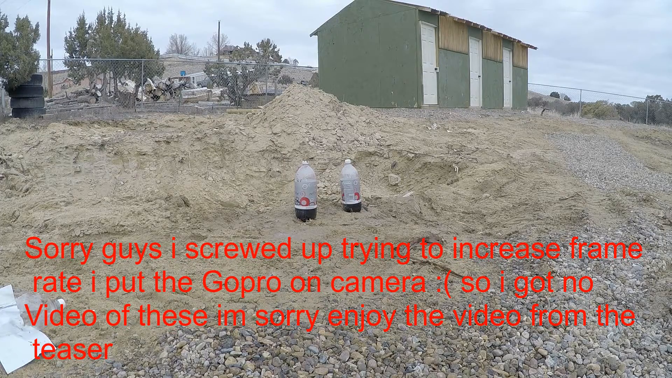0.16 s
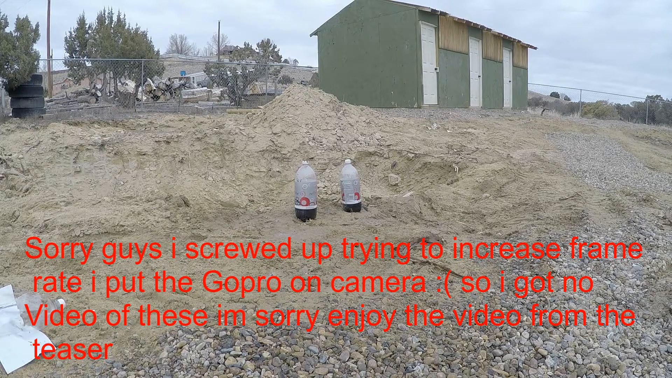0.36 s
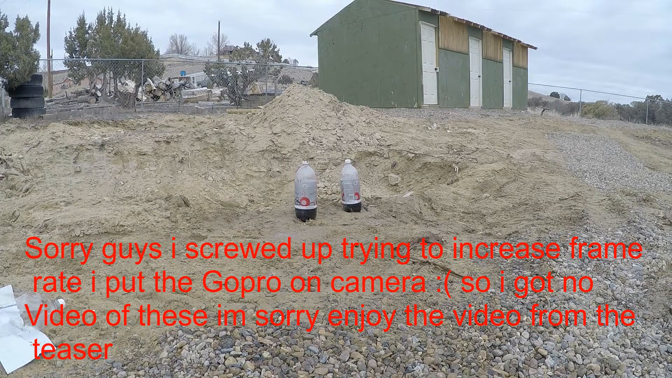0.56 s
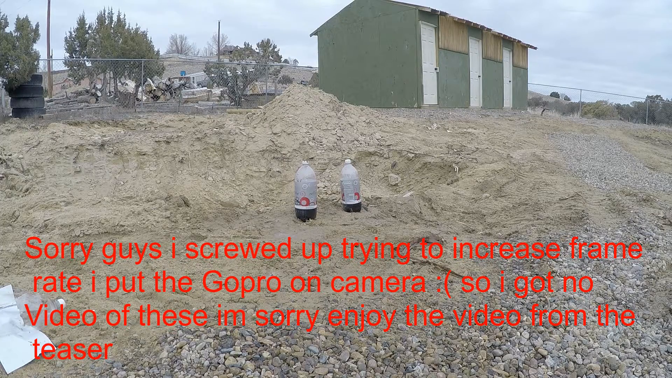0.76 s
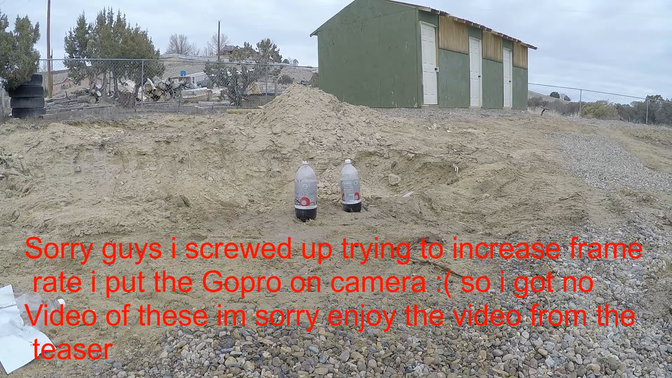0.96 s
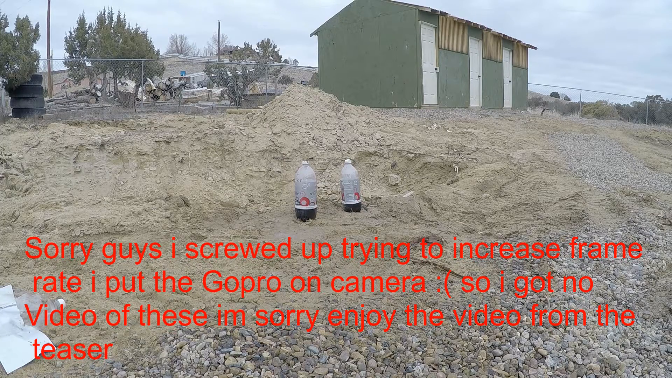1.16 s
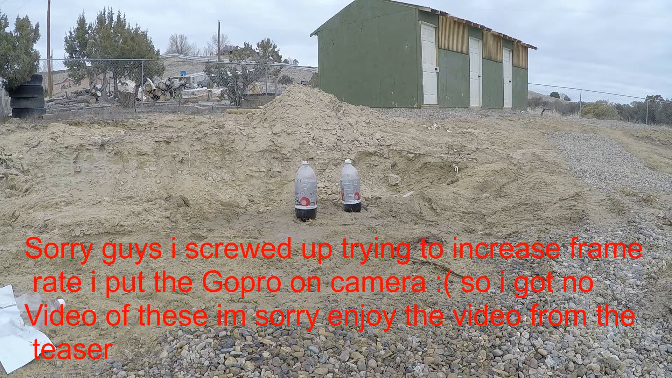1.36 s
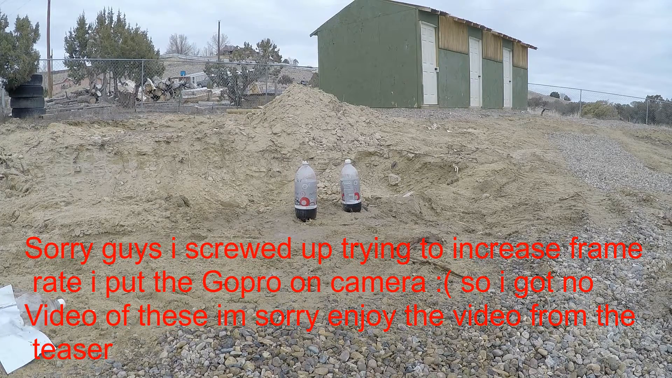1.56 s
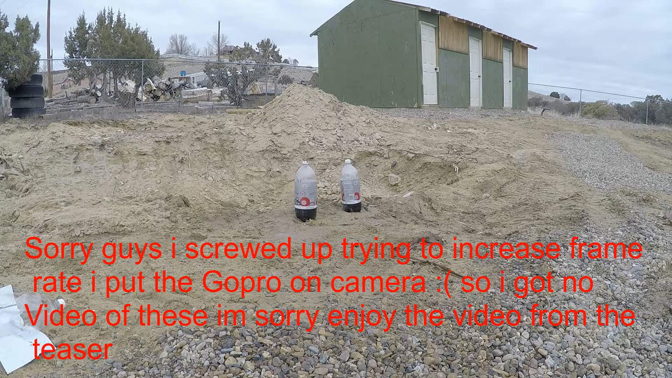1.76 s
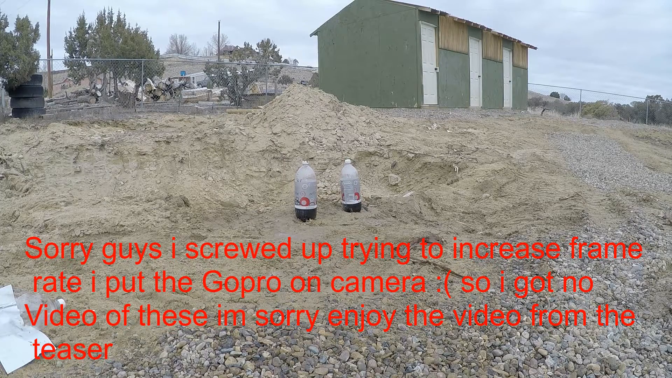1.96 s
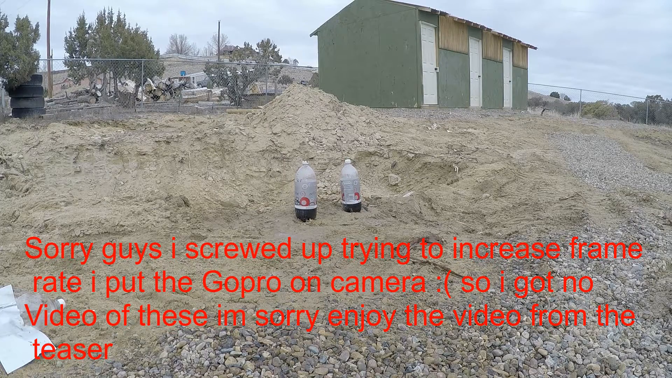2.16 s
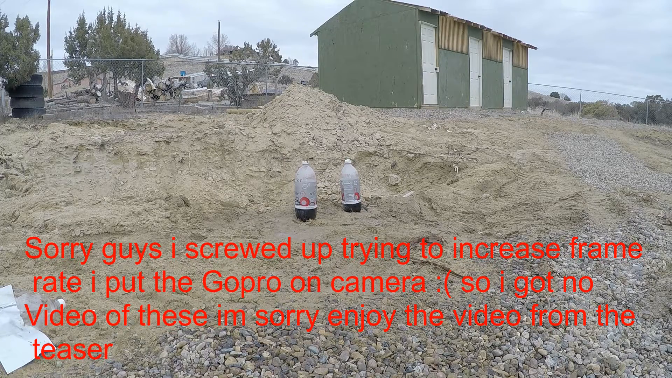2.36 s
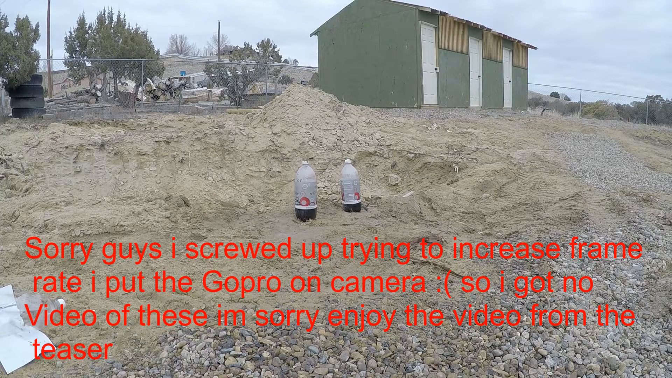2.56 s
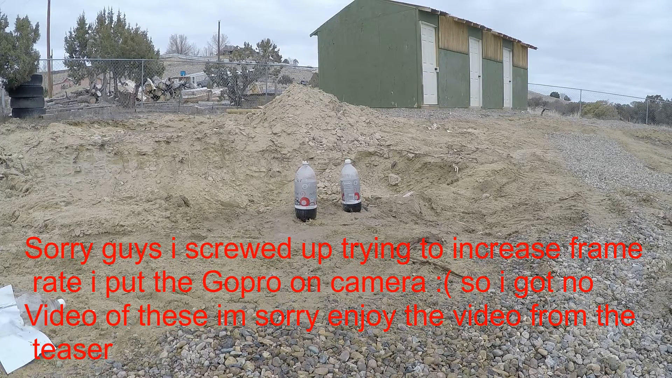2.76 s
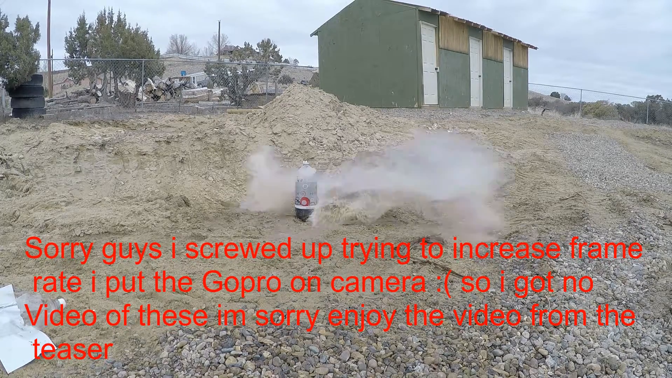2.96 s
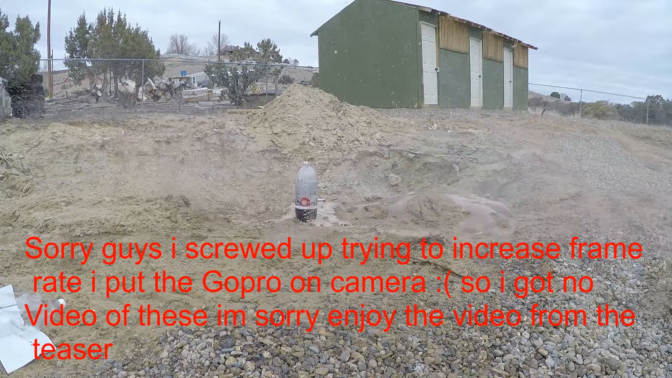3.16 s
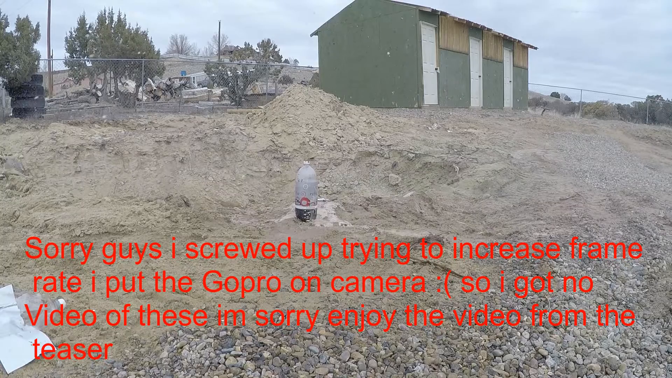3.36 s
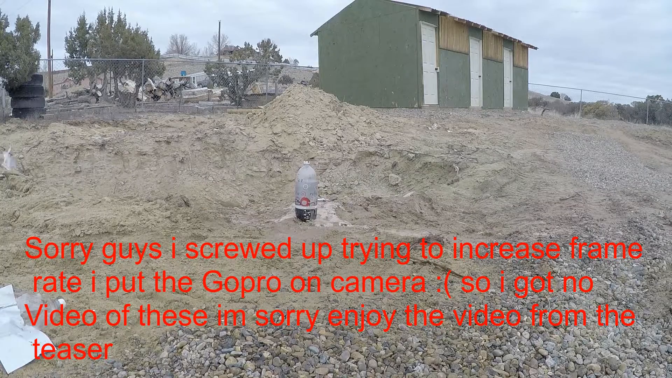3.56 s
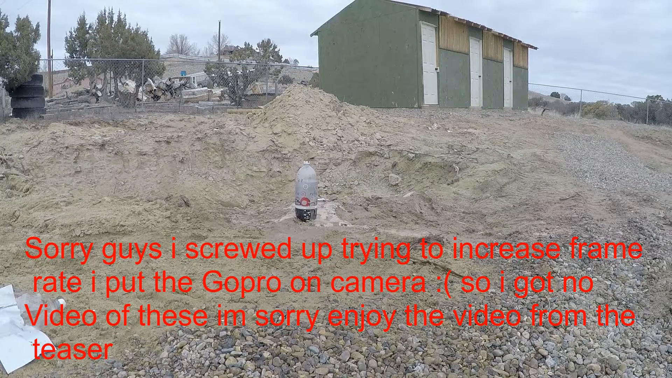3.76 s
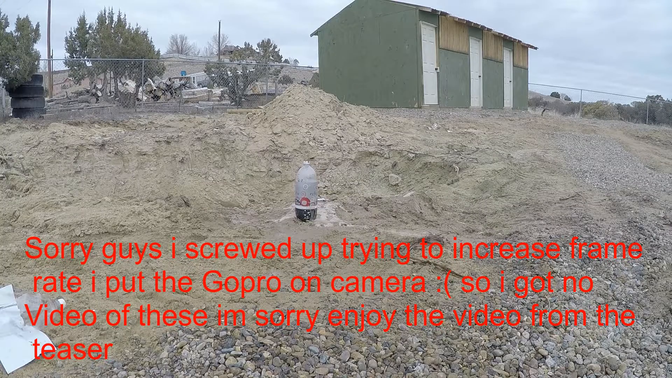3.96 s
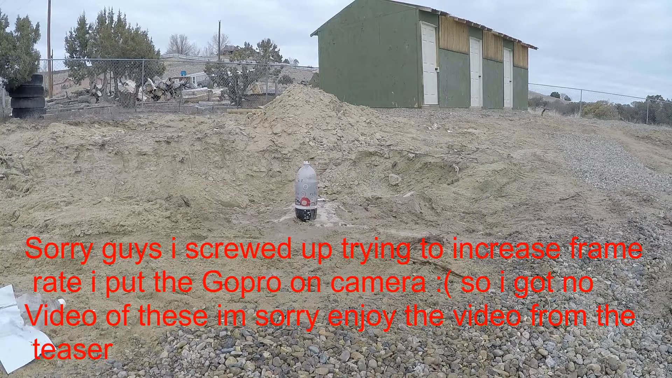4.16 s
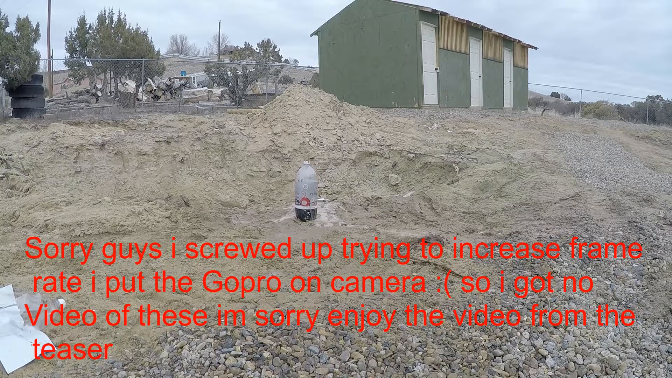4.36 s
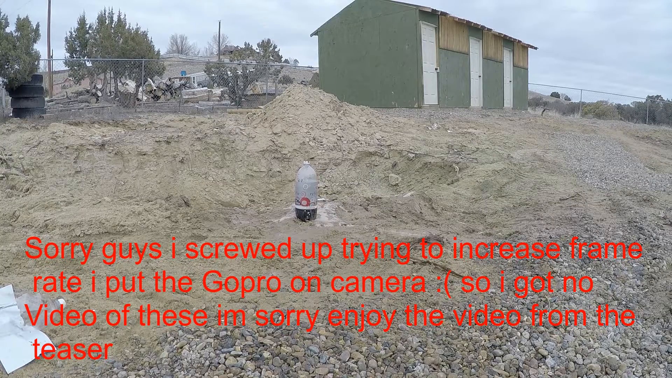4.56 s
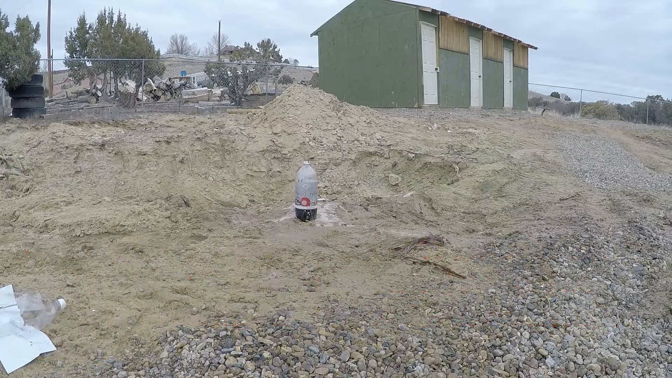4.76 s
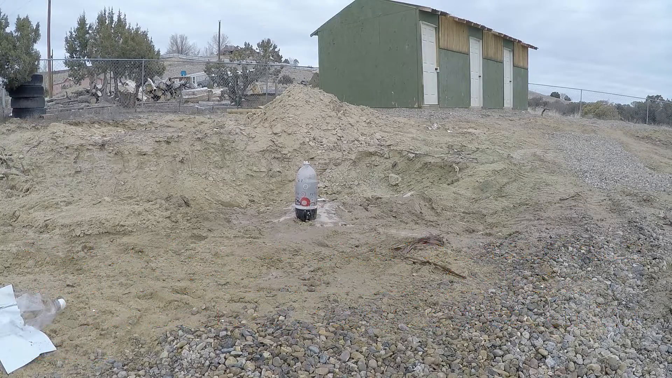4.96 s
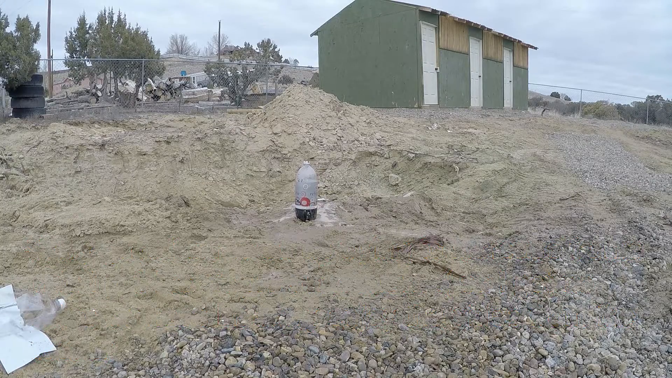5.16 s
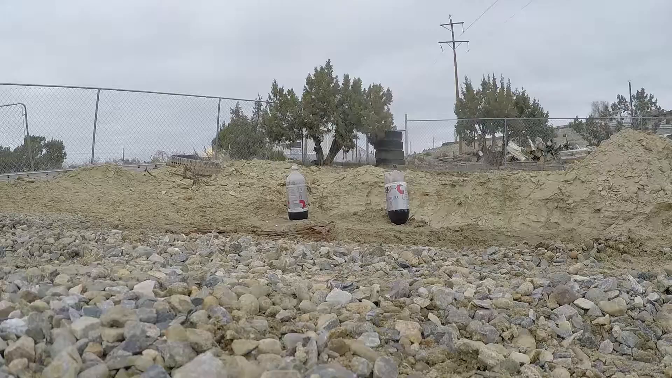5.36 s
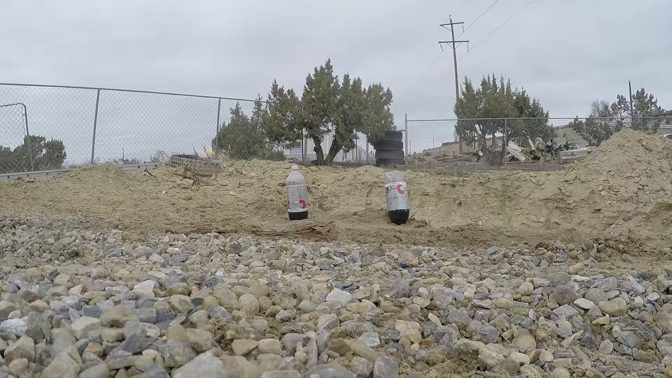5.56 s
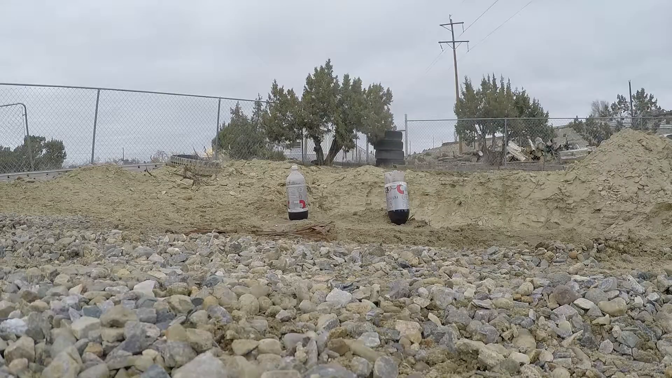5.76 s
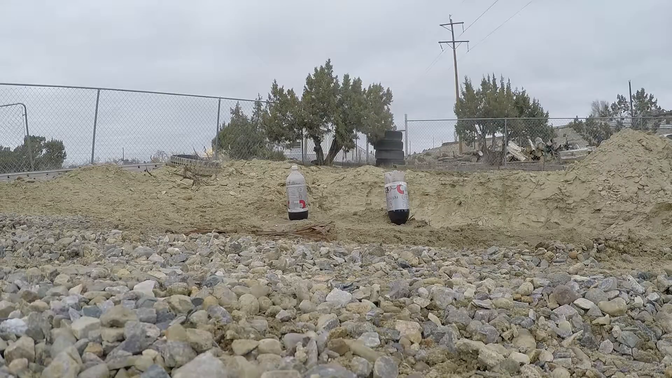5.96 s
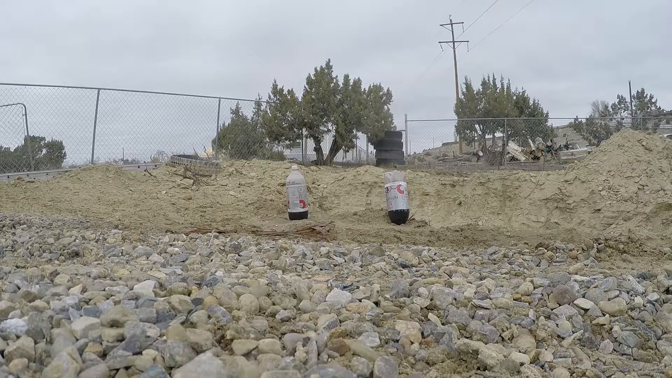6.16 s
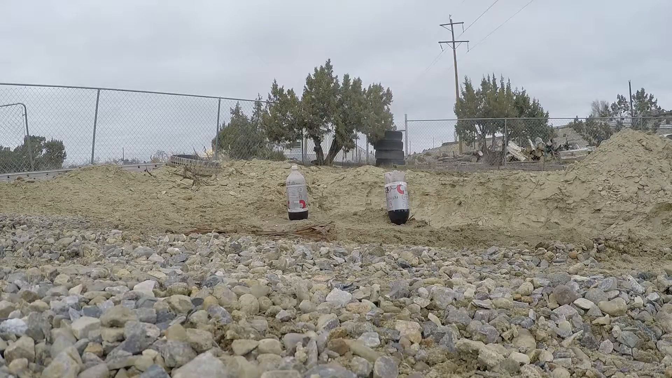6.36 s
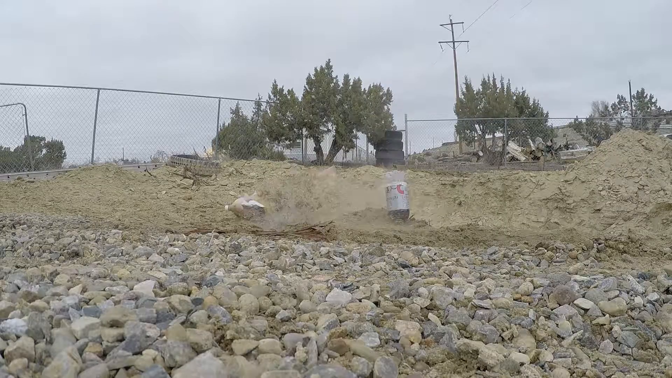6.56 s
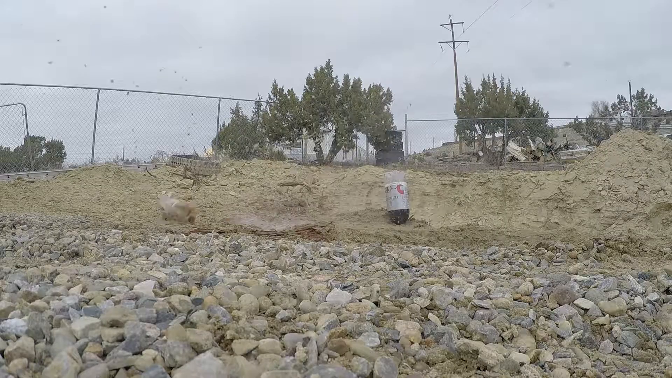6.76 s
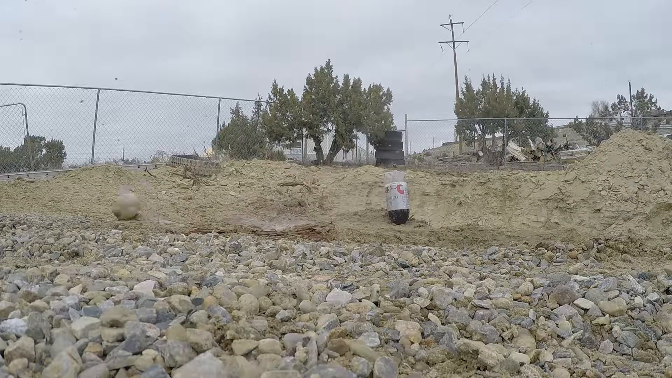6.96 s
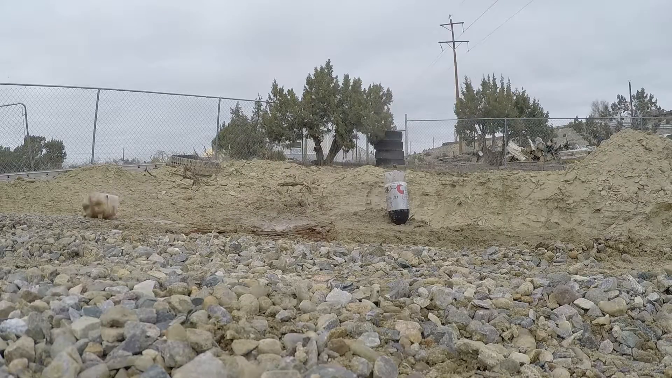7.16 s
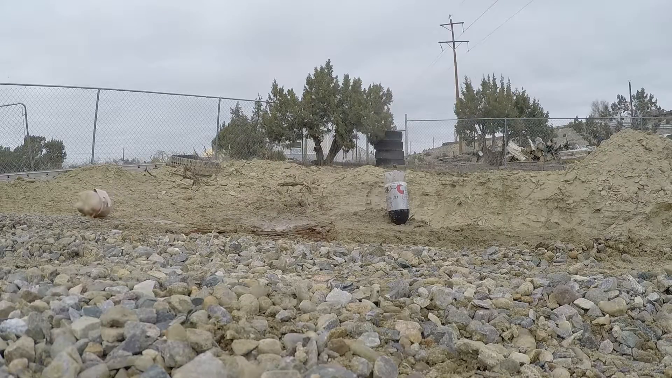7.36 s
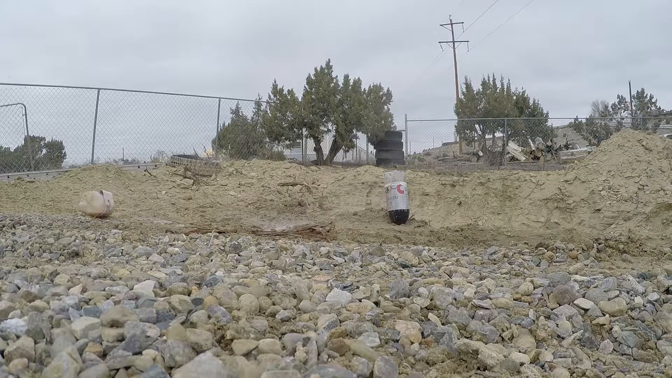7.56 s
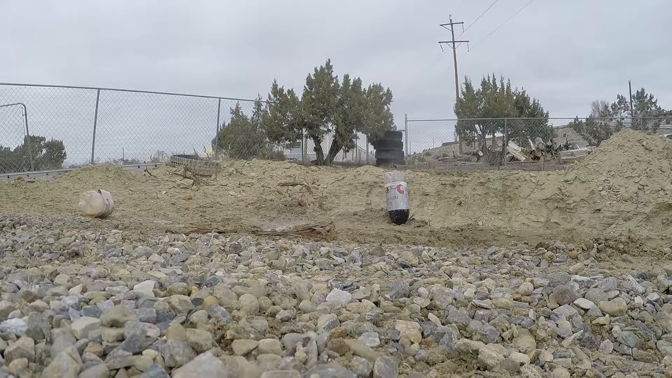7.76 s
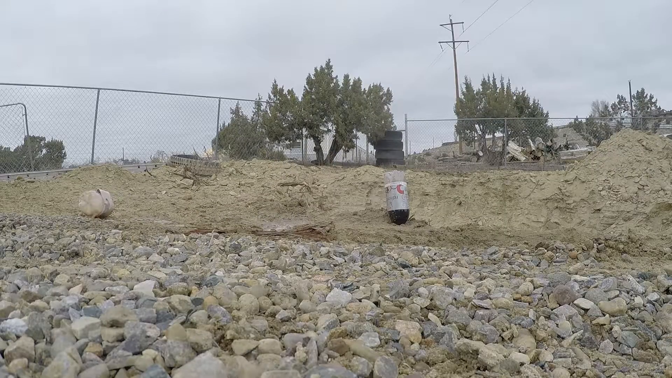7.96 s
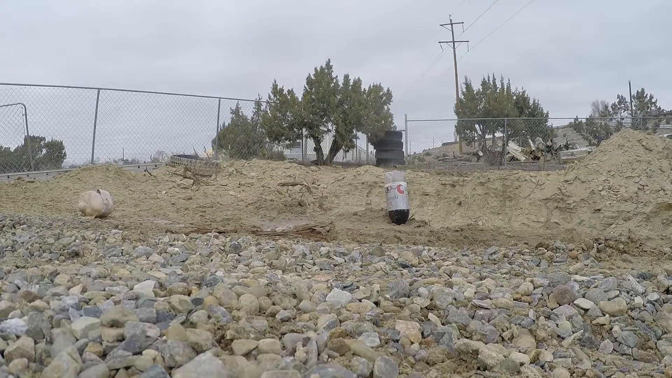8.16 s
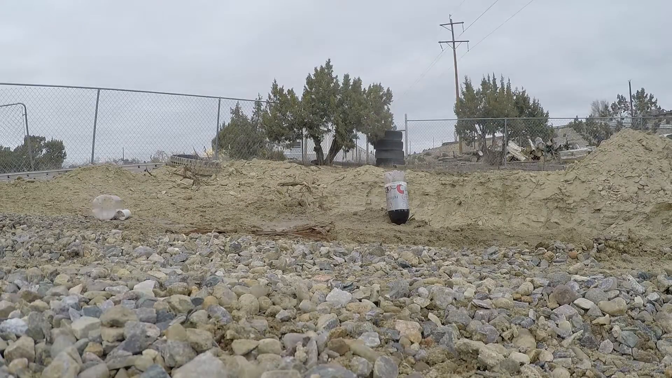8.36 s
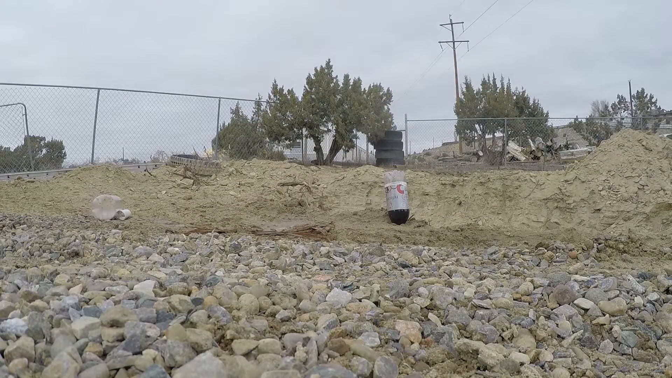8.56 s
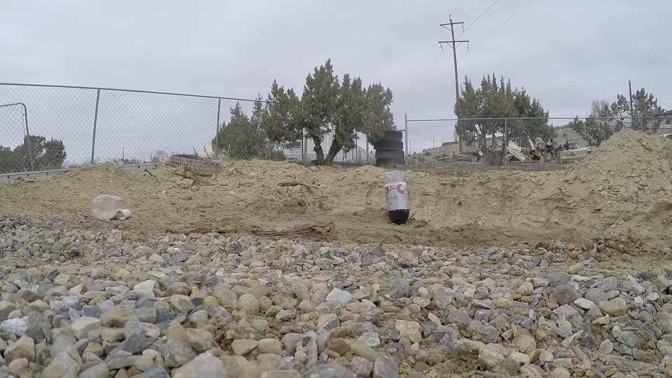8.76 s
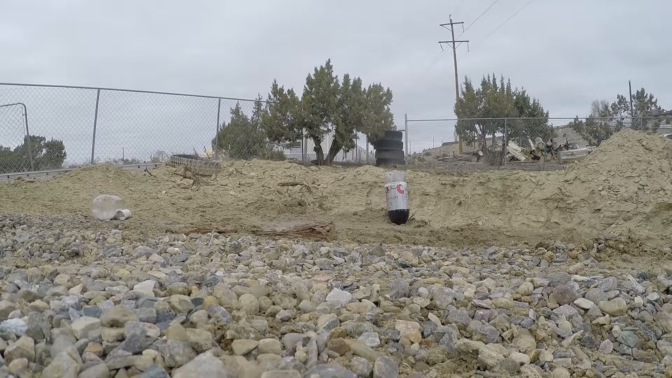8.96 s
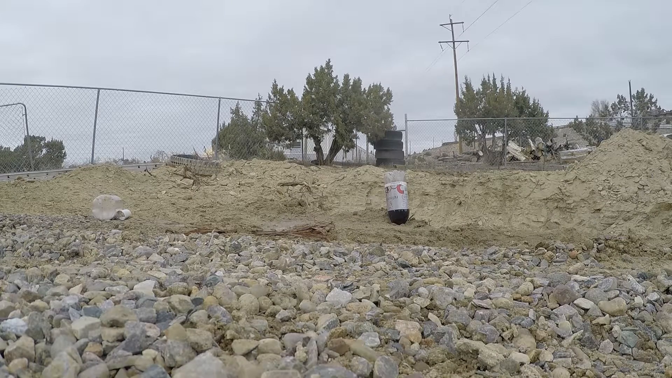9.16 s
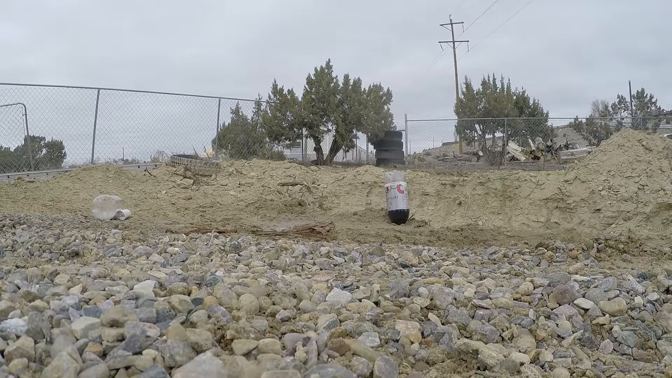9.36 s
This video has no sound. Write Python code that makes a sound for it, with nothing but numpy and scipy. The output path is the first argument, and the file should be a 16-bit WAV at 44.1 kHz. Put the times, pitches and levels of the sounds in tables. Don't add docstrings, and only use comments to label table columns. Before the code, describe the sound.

Outdoors, a pellet snaps and a plastic bottle explodes with a clipped crack, then a clipped shot and another burst, over hiss and distant chirps.

```python
import sys
import numpy as np
from scipy import signal
from scipy.fft import rfft, irfft
from scipy.io import wavfile

SR = 44100
rng = np.random.default_rng(int(sys.argv[2]) if len(sys.argv) > 2 else 0)


def pcm_store(signal):
    levels = np.round(np.clip(np.atleast_2d(signal), -1, 1) * 32767)
    wavfile.write(sys.argv[1], SR, levels.astype(np.int16).T)


def convert_level_to_amplitude(level_db):
    exponent = np.asarray(level_db, float) / 20
    return 10 ** exponent


N = 414540
T = np.arange(N) / SR

# start_s, push_db, suction_db, pitch_hz
SHOCKS = [
    (3.0063, 6, 8, 322),
    (6.5476, -1.5, 3, 265),
]
# start_s, level_db, pitch_hz (negative when it sucks first), rise_s, t60_s
PRESSURE_SWINGS = [(1.0052, -41, 2620, .0005, .035), (3.0093, -10, 281, .0005, 0.038),
                   (3.0120, -26, 23, .004, .15), (3.0115, 2, 1529.5, .002, 0.036),
                   (3.0118, -5, 1330, .0015, .028), (3.0094, -2, 2990, .0004, .016),
                   (3.0135, -5, 3080, .001, .022), (3.0150, -1.5, 2300, .0015, .032),
                   (3.0180, -8, 1720, .001, .032), (3.0208, -9, 2960, .001, .03),
                   (3.0130, -8, 740, .0005, 0.032), (3.0165, -6, 156, .002, 0.029),
                   (3.0200, -34, 55, .02, 1.1), (3.0210, -44, 22, .02, 4.0), (3.0243, -4, 170, .002, 0.028),
                   (3.08, -15, 164, .003, 0.038), (5.2669, -9, 513, .0001, 0.0036),
                   (5.2666, -6, 2348, 0.00021, .005), (5.2673, -5, 34, .005, 0.056),
                   (5.2800, -14.5, -18.5, 0.0034, .15), (6.5490, -22, 30, .002, .08),
                   (6.5514, 0.5, 100, 0.00061, 0.021), (6.5520, -9, 600, .0003, 0.014),
                   (6.5680, -16, -150, .002, .03), (6.5716, -7.5, 125, 0.0012, 0.031),
                   (6.5478, -5, 1360, .0004, .026), (6.5500, -6, 1740, .0004, .026),
                   (6.5490, -10, 2390, .0004, .02), (6.5470, -10, 5150, .0005, .018),
                   (6.5460, -9, 6050, .0004, .014), (6.7960, -45.5, 32, .02, 3.6),
                   (6.7965, -11, 1300, .0002, 0.009), (6.7963, -9, 2600, .0002, .009),
                   (6.7964, -20, 1950, .0002, .008), (6.7960, -27, 9400, .0001, .006),
                   (6.7960, -25, 13700, .0001, .006), (6.7960, -31, 11600, .0001, .005),
                   (5.2668, -27, 5200, .0002, .008), (5.2669, -14, 1050, .0002, .006),
                   (5.2664, -17, 3850, .0002, .01), (6.7990, -28, 212, .001, 0.028)]
# start_s, peak_db, centre_hz, t60_s, bright_edge_db
SPITS = [(2.9573, -22.5, 3491, .02, -22), (2.9968, -18, 5000, 0.018, -14), (3.0047, -9, 2500, 0.046, -23),
         (3.0058, -5, 2400, 0.033, -25), (5.2648, -23, 2300, 0.015, -4), (6.5052, -18, 3500, .015, -11),
         (6.5452, -5, 4000, 0.019, -9), (6.5485, -14, 2000, 0.017, -25), (6.5665, -29, 6000, .03, -7.5),
         (6.583, -33, 6000, 0.019, -7), (6.596, -34, 5000, 0.059, -11), (7.1912, -34, 5500, .014, 6),
         (7.2027, -39, 5000, 0.016, 4), (7.2058, -42, 5000, .025, 2), (6.7960, -26, 3500, .012, 0)]
# start_s, peak_db, centre_hz, t60_s, bright_edge_db
KNOCKS = [(1.0052, -60, 2600, 0.052, -11), (1.006, -40, 4200, 0.027, -14), (2.9600, -10, 2700, .019, -19.5),
          (2.9605, -16.5, 4400, 0.01, -21), (3.0000, -19.5, 3300, .025, -20),
          (3.0087, -9, 2500, 0.044, -21), (3.0135, -14, 4300, 0.023, -17), (3.0200, -11, 2200, 0.044, -25),
          (5.2667, -26, 3900, .012, 3), (6.5082, -10, 3380, .014, -12.5), (6.5115, -22.5, 3500, 0.036, -20),
          (6.5464, 11, 3380, .019, -23), (6.5515, -10, 3300, 0.015, -15), (6.7985, -33, 4800, 0.03, -3),
          (6.8060, -42, 3300, .02, -3), (6.8275, -52, 4900, .02, -6), (7.1915, -43, 2070, 0.023, -14),
          (6.5460, -8, 6400, .014, -20)]
# pitch_hz, width_hz, gain (linear)
PORT = [(6300, 2800, 1.0), (8800, 1800, .45), (13600, 2600, .7)]

# start_s, level_db, decay_stretch (ratio), cut_after_s
TAILS = [
    (2.963, -36, .9, 0.046),
    (3.022, -20.5, 1.1, .7),
    (3.085, -55, 2.6, .5),
    (3.150, -66, 15.0, 0.38),
    (4.810, -63, 3.0, 0.19),
    (5.268, -39, 4.4, 0.045),
    (6.512, -41.5, 1.0, .04),
    (6.556, -25.5, 1.5, .7),
    (6.600, -41, 3.5, .6),
    (6.799, -48, .7, .4),
]
# pitch_hz, t60_s
YARD_T60 = [(70, 0.32), (200, 0.41), (450, 0.19), (1500, 0.17), (3000, 0.14), (8000, 0.14), (15000, 0.082)]
# pitch_hz, level_db (per Hz)
PELLET = [(120, -35.5), (200, -3), (412, -22.5), (748, -8), (946, -20), (2750, -3.5), (5260, -18),
          (15000, -23)]
NEAR_BOOM = [(41, -33.5), (70, -6.5), (241, -5.5), (578, -22), (1600, -13), (3200, -13), (3700, -26),
             (4900, -24), (15000, -66)]
WALL_SLAP = [(290, -35), (500, -10), (733, -2), (883, -16), (2600, -2.5), (8000, -21), (10400, -60),
             (17600, -120)]
PATTER = [(590, -57), (1000, -19), (1530, -11.5), (3030, -8.5), (3930, -16.5), (7000, -19), (9100, -49),
          (15400, -120)]
SCUFF = [(590, -39), (1000, -14), (1900, -5), (2520, -4), (5000, -14), (6500, -42), (11000, -120)]
BUCKET = [(700, -26), (1650, -20), (2100, -4), (2900, -18), (3700, 2), (4500, -18), (9450, -29),
          (12500, -26)]
LOW_PELLET = [(120, -54.5), (200, -17), (1430, -17.5), (1810, -1), (2060, -5), (3800, -5.5), (4550, -13.5),
              (15000, -22)]
LOW_BOOM = [(70, -1.5), (215, -7), (450, -20), (906, -35), (2430, -21), (3600, -11), (4260, -24),
            (15000, -46.5)]
LOW_WASH = [(900, -47), (1720, -3), (2030, -17), (3600, -2), (4250, -18), (5000, -12), (8000, -24),
            (10400, -56)]
SHARD = [(59, -33), (100, -10), (1560, -36), (1810, 4), (2230, -29), (2750, -4), (3110, -12), (15000, -41)]
TAIL_COLOURS = [PELLET, NEAR_BOOM, WALL_SLAP, PATTER, SCUFF, BUCKET, LOW_PELLET, LOW_BOOM, LOW_WASH, SHARD]

# start_s, peak_db, pitch_hz
DEBRIS = [(3.149, -47.5, 765), (3.19, -58, 2900), (3.214, -58, 2430), (3.259, -70, 2240),
          (3.293, -55, 2430), (3.309, -57, 2920), (3.349, -51, 492), (3.359, -55, 501), (3.385, -52, 2970),
          (3.419, -53, 3003), (3.442, -54, 2830), (3.459, -55.5, 2900), (3.510, -55, 3000),
          (3.546, -52, 1350), (3.549, -60, 720), (3.548, -52, 200), (3.596, -55, 723), (3.674, -53, 1250),
          (3.675, -55, 2100), (3.729, -56, 2440), (3.749, -55.5, 2920), (3.867, -57, 3017),
          (4.519, -56, 2460), (4.708, -52.5, 3380), (4.784, -52.5, 2470), (4.812, -46, 3880),
          (4.815, -51, 1650), (4.849, -56, 2520), (4.889, -58, 2533), (6.829, -58, 1819),
          (6.938, -53, 1774), (7.025, -54, 3174), (7.079, -55.5, 3480), (7.159, -56.5, 3755)]
# pitch_hz, level_db, t60_s
HOUSING = [(1620, -24, .2), (1809, -4, .27), (2250, -20, .25), (2670, -15, .09), (2800, -2, 0.11),
           (2920, -19.5, .2), (3480, -25, 0.15), (3773, -22, 0.13), (4909, -30, 0.15)]
# start_s, level_db, panel_db (extra on the 1.8 kHz panel mode)
HOUSING_HITS = [
    (6.509, -42, -8),
    (6.547, -16, -15),
    (6.7960, -39, -3),
]

# start_s, length_s, pitch_hz, level_db, fade_db
HELD = [
    (0.0, 0.076, 3530, -59, 26.5),
    (0.967, .38, 3664, -63, 7),
    (2.339, 0.43, 3724, -52, 14),
]
# start_s, length_s, second_partial_hz (at the start), level_db
FALLS = [
    (1.338, 0.25, 3304, -59),
    (2.755, 0.24, 3305, -56),
]
# start_s, length_s, pitch_hz, level_db, hoarseness (about 0-1)
MATES = [(0.0, 0.17, 2540, -62, 0.37), (.075, 0.097, 3000, -64.5, 0.8), (1.04, .14, 2640, -72, .6),
         (1.222, 0.2, 2720, -66, 0.6), (1.525, 0.12, 2650, -64.5, 1.02), (2.40, .16, 2680, -73, .8),
         (2.61, 0.21, 2800, -65.5, 0.7), (2.70, .1, 2250, -71, .8)]

# pitch_hz, level_db (per Hz)
HISS = [(88, -31), (160, -5), (240, -6.5), (900, -12), (2630, -12.5), (12300, -23), (14100, -18.5),
        (15600, -26)]
# pitch_hz, level_db, width_hz
WHINES = [(14250, -82.5, 250), (9300, -91, 200), (4800, -86, 110)]
# start_s, level_db, half_recovered_after_s, release_s
DUCKS = [
    (3.01, -10, .62, .3),
    (6.55, -4, .2, .25),
]
# time_s, level_db
WIND = [(0.0, -61.5), (1.39, -65), (1.65, -60.5), (1.94, -66), (2.72, -64.5), (4.29, -66), (5.15, -63),
        (5.4, -62.5), (6.41, -64.5), (6.81, -68.5), (7.04, -57), (7.83, -67), (8.54, -60), (9.4, -63.5)]
# time_s, level_db
DRONE = [(0.0, -70.5), (1.5, -68), (2.0, -66.5), (3.6, -66), (5.25, -63.5), (5.36, -78.5), (9.4, -78.5)]
# start_s, end_s
GAPS = [
    (5.2566, 5.2635),
    (5.309, 5.356),
]


def rms_one(x):
    return x / np.sqrt(np.mean(x ** 2) + 1e-20)


def band(x, low_hz, high_hz, order=2):
    edges_hz = [max(low_hz, 10), min(high_hz, 19000)]
    return signal.sosfilt(signal.butter(order, edges_hz, "band", fs=SR, output="sos"), x)


def at_hz(points, hz):
    table_hz, values = np.array(points)[:, 0], np.array(points)[:, 1]
    return np.interp(np.log(hz), np.log(table_hz), values)


def resonate(x, hz, width):
    r = np.exp(-np.pi * width / SR)
    feedback = [1, -2 * r * np.cos(2 * np.pi * hz / SR), r * r]
    return signal.lfilter([(1 - r * r) / 2, 0, (r * r - 1) / 2], feedback, x)


def add(out, s, x):
    i = int(s * SR)
    out[i:i + len(x)] += x[:N - i]


def drift(rate, size):
    knots = rng.standard_normal(size // 50 + 600)
    r = np.exp(-100 * np.pi * rate / SR)
    slow = signal.lfilter([1], [1, -2 * r, r * r], knots)[500:]
    return np.interp(np.arange(size) / 50, np.arange(len(slow)), rms_one(slow))


def blasts():
    out = np.zeros(N)
    for s, push_db, suck_db, hz in SHOCKS:
        cycle = np.sin(2 * np.pi * hz * T[:int(SR / hz)])
        add(out, s, cycle * convert_level_to_amplitude(np.where(cycle > 0, push_db, suck_db)))
    for s, db, hz, rise, t60 in PRESSURE_SWINGS:
        t = T[:int(t60 * SR)]
        envelope = convert_level_to_amplitude(db - 60 * t / t60) * (1 - np.exp(-t / rise))
        add(out, s, envelope * np.sin(2 * np.pi * hz * t))
    return out


def crack(hz, t60, edge_db, width, strike):
    t = T[:3000]
    body_noise, edge_noise = rng.standard_normal((2, 3000))
    body_noise[16] += strike
    low_hz = max(hz * (.45 - .5 * width), 150)
    high_hz = hz * (1 + 0.86 * width)
    body = rms_one(band(resonate(body_noise, hz, width * hz), low_hz, high_hz, order=3))
    port = sum(gain * resonate(resonate(edge_noise, port_hz, port_width), port_hz, port_width)
               for port_hz, port_width, gain in PORT)
    spit = body * convert_level_to_amplitude(-60 * t / t60) + rms_one(port) * convert_level_to_amplitude(edge_db - 150 * t / t60)
    spit = spit * np.minimum(t / 0.00013, 1)
    return spit / np.abs(spit).max()


def cracks():
    out = np.zeros(N)
    for rows, width, strike in [(SPITS, 0.99, 0), (KNOCKS, 0.25, 8.0)]:
        for s, db, hz, t60, edge_db in rows:
            add(out, s, convert_level_to_amplitude(db + 1.5) * crack(hz, t60, edge_db, width, strike))
    return out


def tails():
    out = np.zeros(N)
    edges = 60 * 2 ** np.arange(0, 8.2, 1 / 4)
    for (s, db, stretch, cut), colour in zip(TAILS, TAIL_COLOURS):
        white = rng.standard_normal((2, 32000))
        lumps_db = 2.6 * drift(80, size=32000)
        t = T[:min(int(cut * SR), 32000)]
        bands = {}
        for k, (low, high) in enumerate(zip(edges, edges[1:])):
            if .8 * colour[0][0] < low < colour[-1][0]:
                noise = white[k % 2, :len(t)]
                bands[low] = convert_level_to_amplitude(at_hz(colour, 1.09 * low)) * band(noise, low, high, order=3)
        fades = np.clip(np.minimum(t / .003, (cut - t) / (0.12 * cut)), 0, 1)
        scale = convert_level_to_amplitude(db + lumps_db[:len(t)]) * fades / np.std(sum(bands.values()))
        echo = np.zeros(len(t))
        for low, noise in bands.items():
            decay_db = -60 * t / stretch / at_hz(YARD_T60, low)
            echo += noise * convert_level_to_amplitude(2.2 * drift(40, size=len(t)) + decay_db)
        add(out, s, scale * echo)
    return out


def debris():
    out, t = np.zeros(N), T[:2500]
    for s, db, hz in DEBRIS:
        noise = rng.standard_normal(2500)
        note = rms_one(resonate(noise, hz, 0.12 * hz)) * convert_level_to_amplitude(-60 * t / 0.041)
        tick = rms_one(band(noise, .4 * hz, 1000 + 1.1 * hz, order=3)) * convert_level_to_amplitude(-8.5 - 60 * t / 0.031)
        add(out, s, convert_level_to_amplitude(db - 6.0) * (note + tick))
    return out


def housing():
    out, t = np.zeros(N), T[:20000]
    for s, db, panel_db in HOUSING_HITS:
        for hz, mode_db, t60 in HOUSING:
            level_db = db + mode_db + panel_db * (1700 < hz < 1950) + 1.6 * drift(30, size=20000)
            ring = np.sin(2 * np.pi * hz * t + rng.uniform(0, 3))
            add(out, s, convert_level_to_amplitude(level_db - 60 * t / t60) * ring)
    return out


def voice(rows):
    s, hz, *levels = np.transpose(rows)
    t = np.arange(s[0], s[-1], 1 / SR)
    pitch = np.interp(t, s, hz) * (1 + .004 * drift(80, size=len(t)))
    fade = np.clip(np.minimum(t - s[0] + 0.0035, s[-1] - t) / 0.021, 0, 1)
    fade = fade * convert_level_to_amplitude(4.0 + 2.0 * drift(35, size=len(t)))
    return 2 * np.pi * np.cumsum(pitch) / SR, [fade * convert_level_to_amplitude(np.interp(t, s, db)) for db in levels]


def hoarse(phase, depth, top_hz):
    breath = rms_one(band(rng.standard_normal(len(phase)), 9, top_hz))
    return (1 - depth ** 2 / 2 + depth * breath) * np.sin(phase)


def throb(size):
    return 1 + .55 * np.cos(2 * np.pi * 19 * T[:size] + 1.8 * drift(6, size=size))


def call_opening(out, s, hz):
    scoop_s, scoop_db = .06, -65.5
    rasp_hz, rasp_s, rasp_db = 2900, .11, -71
    start = s - scoop_s
    sweep, (level,) = voice([(start, 0.62 * hz, scoop_db),
                             (start + .4 * scoop_s, .89 * hz, scoop_db),
                             (s + 0.0097, hz, scoop_db)])
    add(out, start, level * hoarse(sweep, .55, top_hz=120))
    air, (level,) = voice([(start, .9 * rasp_hz, rasp_db - 8.0),
                           (start + 0.39 * rasp_s, rasp_hz, rasp_db),
                           (start + rasp_s, rasp_hz, rasp_db - 5.0)])
    add(out, start, level * hoarse(air, 1.6, top_hz=220) / 0.63)


def lower_voice(out, s, length, hz, db, upper_phase):
    low_hz, held, low_db = .555 * hz, 0.75 * length, -76
    phase, (level,) = voice([(s, .82 * low_hz, low_db),
                             (s + 0.06, low_hz, low_db),
                             (s + held, low_hz - 560 * held, low_db - 4.0)])
    own_tone = convert_level_to_amplitude(.35 * (db + 63)) * hoarse(phase, 0.4, top_hz=90)
    sum_tone = convert_level_to_amplitude(-3) * np.sin(phase + upper_phase[:len(phase)])
    add(out, s, level * (own_tone + sum_tone))


def held_notes(out):
    for s, length, hz, db, fade_db in HELD:
        rise = 0.041 * (s > 0) + .001
        phase, (level,) = voice([(s, hz, db - 5),
                                 (s + rise, hz, db),
                                 (s + length, hz - 4.5 * fade_db, db - fade_db)])
        octave_gain = convert_level_to_amplitude(-58 - .7 * db + 3.0 * drift(21, size=len(phase)))
        note = throb(len(phase)) * np.sin(phase) + octave_gain * np.sin(2 * phase)
        add(out, s, level * note)
        if s > .06:
            lower_voice(out, s, length, hz, db, phase)
            call_opening(out, s, hz)


def falling_notes(out):
    fall_hz_per_s, end_hz, third_db = 2300, 2870, -13
    for s, length, hz, db in FALLS:
        landed = s + min((hz - end_hz) / fall_hz_per_s, .9 * length)
        phase, (second, third) = voice([(s, hz, db - 4.5, db + third_db),
                                        (landed, end_hz, db, db + 2 * third_db),
                                        (max(s + length, s + 0.19), end_hz, db - 13, db + 3 * third_db)])
        note = second * (np.sin(phase) + convert_level_to_amplitude(-12) * np.sin(phase / 2)) + third * np.sin(3 * phase / 2)
        add(out, s, (note * throb(len(note)))[:int(length * SR)])


def hoarse_notes(out):
    sag_hz_per_s = 475
    for s, length, hz, db, rough in MATES:
        phase, (level,) = voice([(s, hz, db - 4.0),
                                 (s + .4 * length, hz - sag_hz_per_s * .4 * length, db),
                                 (s + length, hz - sag_hz_per_s * length, db - 4.5)])
        add(out, s, level * hoarse(phase, min(rough, 1.4), top_hz=300 * rough))


def birds():
    out = np.zeros(N)
    held_notes(out)
    falling_notes(out)
    hoarse_notes(out)
    for lag, db in [(.023, -13.5), (.047, -13.5), (.08, -17)]:   # lag_s, level_db
        add(out, lag, convert_level_to_amplitude(db) * out.copy())
    return out


def stirred(levels_db):
    gain = np.zeros(N)
    for (s, *_), db in zip(SHOCKS, levels_db):
        since = np.where(T > s, T - s, 99)
        gain += convert_level_to_amplitude(db - 60 * since / .9)
    return gain


def wind():
    gust = convert_level_to_amplitude(np.interp(T, *np.transpose(WIND)) + 2.0 * drift(4, size=N)) + stirred([-42, -54])
    return gust * rms_one(band(rng.standard_normal(N), 10, 70))


def drone():
    level = convert_level_to_amplitude(np.interp(T, *np.transpose(DRONE)) + 1.5 * drift(1.0, size=N)) + stirred([-53, -49.5])
    return level * rms_one(band(rng.standard_normal(N), 85, 140, order=3))


def camera_noise():
    hz = np.maximum(np.fft.rfftfreq(N, 1 / SR), 1)
    shape = convert_level_to_amplitude(at_hz(HISS, hz)) * np.minimum(hz / 130, 1) ** 2
    out = convert_level_to_amplitude(-65.5) * rms_one(irfft(rfft(rng.standard_normal(N)) * shape, N))
    for whine_hz, db, width in WHINES:
        out += convert_level_to_amplitude(db) * rms_one(resonate(rng.standard_normal(N), whine_hz, width))
    out += convert_level_to_amplitude(-80.5 + 2.5 + 1.0 * drift(8, size=N)) * np.sin(2 * np.pi * 8634 * T)
    duck_db = np.zeros(N)
    for s, db, ease, release in DUCKS:
        recovery = np.exp(np.clip((T - s - ease) / release * 2, -50, 50))
        duck_db += db * (T > s) / (1 + recovery)
    hiss_end_hz = 15600
    out = signal.sosfilt(signal.cheby2(12, 80, 1.05 * hiss_end_hz, fs=SR, output="sos"), out)
    return out * convert_level_to_amplitude(duck_db)


def scene():
    bursts = blasts() + cracks()
    answers = tails() + debris() + housing()
    background = birds() + wind() + drone() + camera_noise()
    return (bursts + answers + background)[None]


def top_cut(x):
    return signal.sosfilt(signal.butter(12, 16470, fs=SR, output="sos"), x)


def record(dry):
    top, ceiling, treble_end_hz = .9, .84, 15600
    x = dry / (1 + np.abs(dry / top) ** 6) ** (1 / 6)
    edge = signal.ellip(10, .2, 80, treble_end_hz, fs=SR, output="sos")
    x = np.clip(signal.sosfilt(edge, x), -ceiling, ceiling)
    x = signal.sosfilt(edge, x)
    for start, end in GAPS:
        x = x * np.clip(np.maximum(start - T, T - end) / 0.00078, 0, 1)
    return top_cut(x)


dry = scene()
out = record(dry)
pcm_store(out)
```